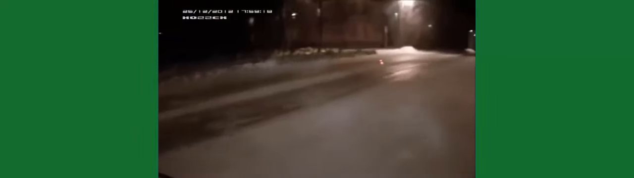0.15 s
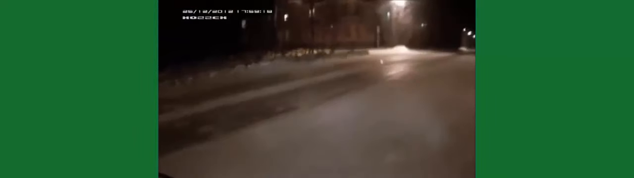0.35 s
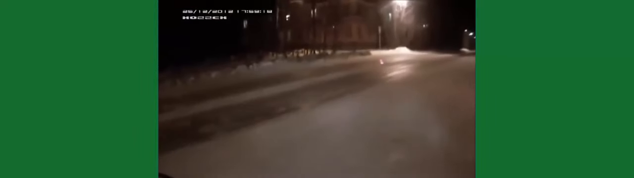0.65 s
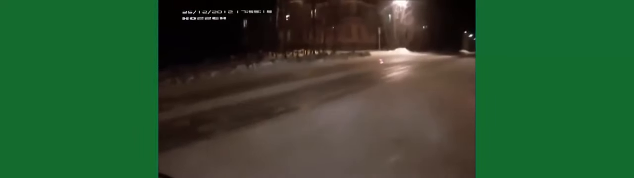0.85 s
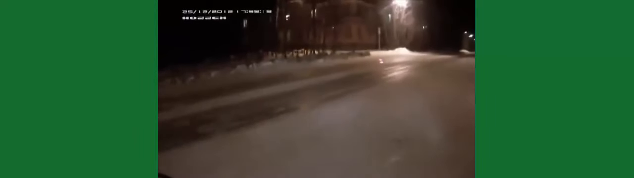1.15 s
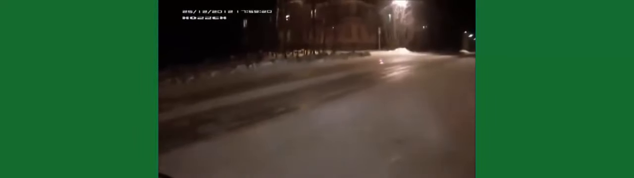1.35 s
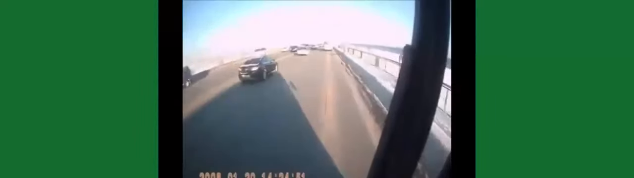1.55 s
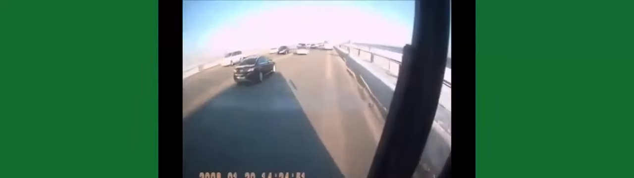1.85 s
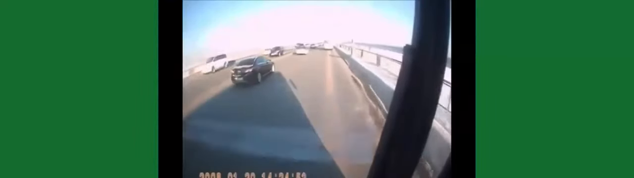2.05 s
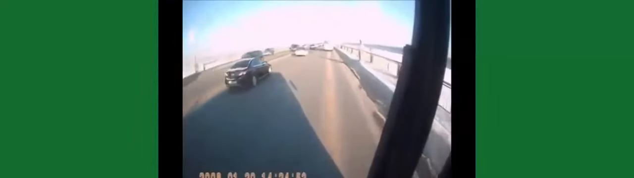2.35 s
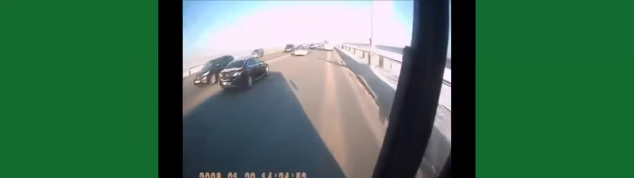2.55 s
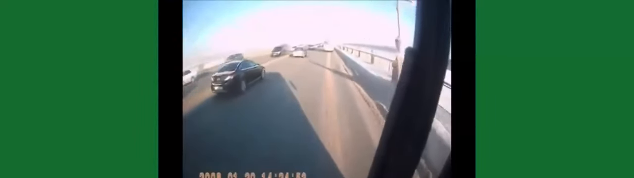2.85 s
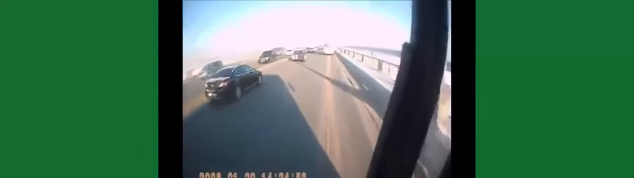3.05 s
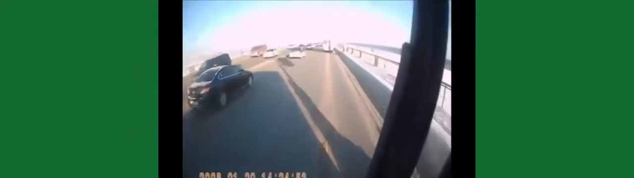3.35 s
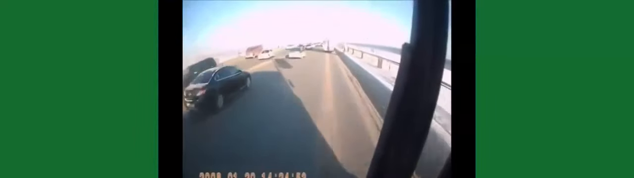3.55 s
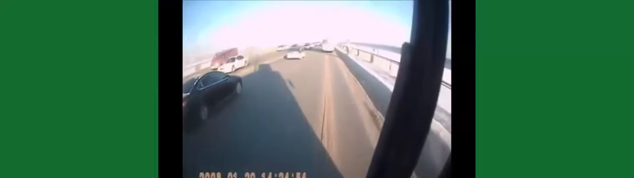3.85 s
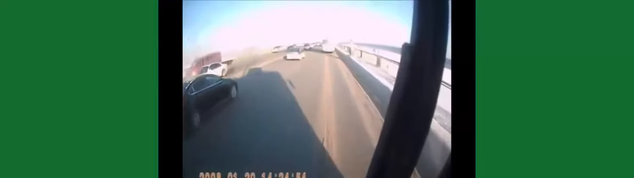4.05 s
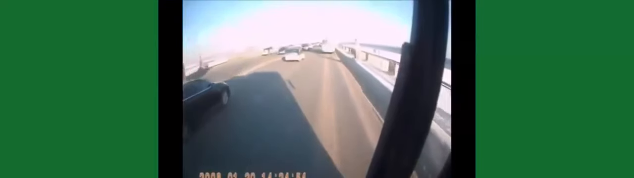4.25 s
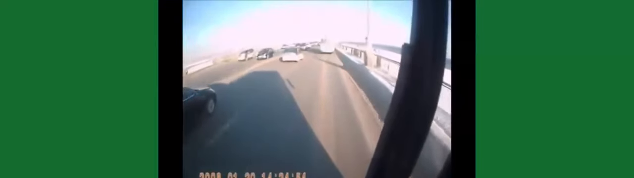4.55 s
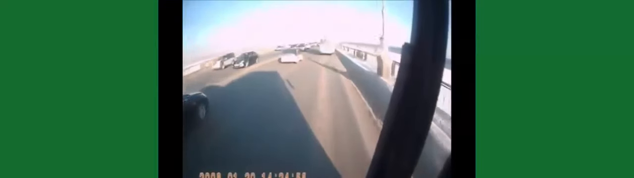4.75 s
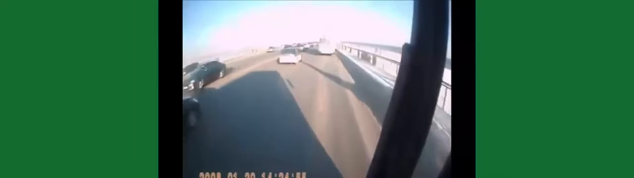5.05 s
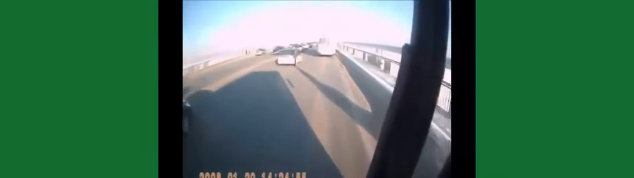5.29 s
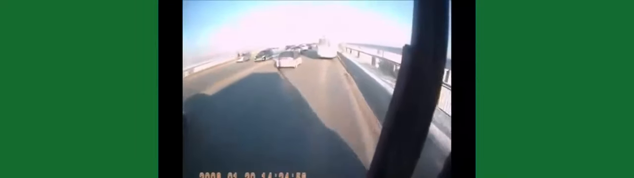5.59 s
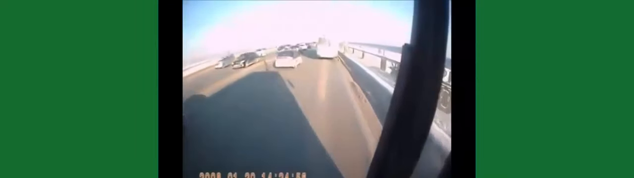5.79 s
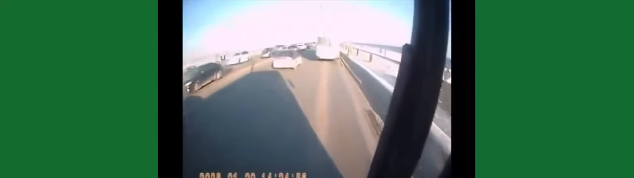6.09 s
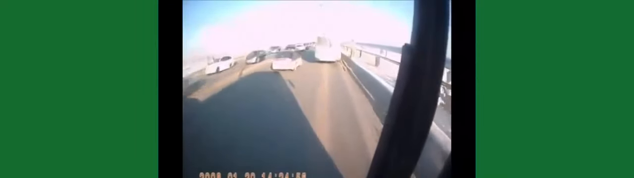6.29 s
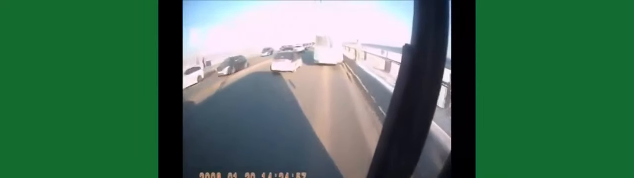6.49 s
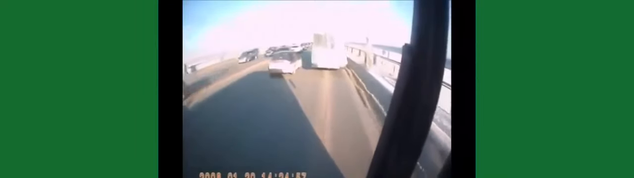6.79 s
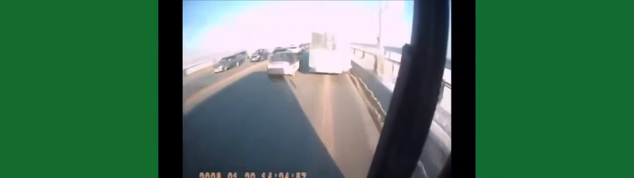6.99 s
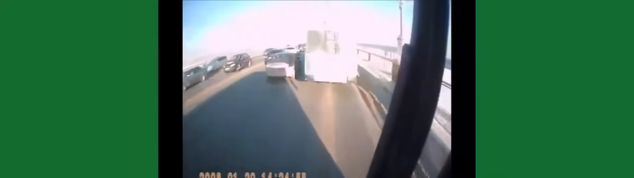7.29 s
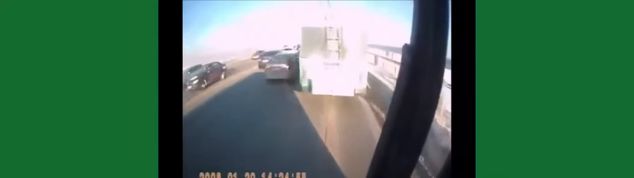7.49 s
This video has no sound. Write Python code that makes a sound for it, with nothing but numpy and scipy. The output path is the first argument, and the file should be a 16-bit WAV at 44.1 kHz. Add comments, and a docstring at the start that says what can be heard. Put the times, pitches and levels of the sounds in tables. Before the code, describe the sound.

A violent car crash with booming body, crunching metal and scattering debris, then an abrupt cut to dull bus road rumble with jolts and rattling panels.

```python
"""Night crash, then a bus ride

Two dashboard cameras, one after the other. First a car crashes at night over its idling engine: the shell booms,
panels thud, metal crunches, debris sprays, all shaped from noise; small bits tick and trim squeaks as plain tones.
Then a bus crosses a bridge: filtered noise makes the dull road roar and the rattling panels, short low swings
make the jolts over joints. The crash overloads an off-centre input; the bus sounds dull, with false copies."""
import sys
import numpy as np
from scipy import signal
from scipy.fft import rfft, irfft, next_fast_len
from scipy.io import wavfile
from scipy.ndimage import uniform_filter1d

SR = 44100
rng = np.random.default_rng(int(sys.argv[2]) if len(sys.argv) > 2 else 0)


def unload_audio(sound):
    """Save the sound as a 16-bit wav file, at the path given as the first command line argument."""
    columns = np.transpose(np.atleast_2d(sound))
    # keep every value between -1 and 1, then stretch to whole-number steps
    steps = np.round(np.clip(columns, -1, 1) * 32767)
    wavfile.write(sys.argv[1], SR, steps.astype(np.int16))


N = 336483
T = np.arange(N) / SR  # time of each sample [s]
CUT_S = 1.779  # the crash gives way to the bus


def amp(db):
    """Turns dB into a plain multiplier."""
    return 10 ** (np.asarray(db) / 20)


def evened(x):
    """Scales a signal to an average strength (rms) of 1."""
    return x / np.sqrt(np.mean(x ** 2) + 1e-20)


def smooth_noise(length):
    """Slowly wandering noise, averaged over this many samples, rms 1."""
    return evened(uniform_filter1d(rng.standard_normal(N), size=length))


def column(rows, index):
    """Draws straight lines between the rows of a table, to get a value for every sample."""
    rows = np.asarray(rows, float)
    return np.interp(T, rows[:, 0], rows[:, index])


def add(mix, s, sound):
    """Mixes a sound in, starting at s seconds."""
    part = mix[max(round(s * SR), 0):][:len(sound)]
    part += sound[:len(part)]


def colour(x, points):
    """Gives noise its tone by making some pitches stronger than others; rms 1."""
    f, db = np.transpose(points)
    hz = np.fft.rfftfreq(N, 1 / SR)
    gain_db = np.interp(np.log(hz + 1), np.log(f + 1), db, -120, -120)
    return evened(irfft(rfft(x) * amp(gain_db), N))


def steady(x, share):
    """Evens out part of the chance swells of a narrow noise."""
    outline = abs(signal.hilbert(x, next_fast_len(N))[:N])
    swell = uniform_filter1d(outline, size=900)
    return evened(x / (swell + 0.066) ** share)


def grit(per_s, spread_db, share, patchy_db):
    """Noise mixed with a share of uneven clicks, in drifting patches of time and pitch."""
    sizes = amp(spread_db * np.minimum(rng.exponential(1, N), 4))
    clicks = sizes * (rng.random(N) < per_s / SR)
    clicks = evened(clicks * rng.choice([-1, 1], N))
    x = share * clicks + (1 - share) * rng.standard_normal(N)
    z = signal.stft(x, nperseg=256, noverlap=192)[2]
    patches = uniform_filter1d(rng.standard_normal(z.shape), size=3, axis=0)  # across pitch
    patches = evened(uniform_filter1d(patches, size=20, axis=1))  # across time
    return signal.istft(z * amp(patchy_db * patches), nperseg=256, noverlap=192)[1][:N]


def whistle(rows, waver):
    """A wavering tone that follows rows of time, pitch and level, with soft edges at both ends."""
    drift = smooth_noise(300)
    inside = 1. * (T > rows[0][0]) * (T < rows[-1][0])
    inside = uniform_filter1d(inside, size=600)
    turns = np.cumsum(column(rows, index=1) * (1 + waver * drift)) / SR
    return np.sqrt(2) * amp(column(rows, index=2)) * inside * np.sin(2 * np.pi * turns)


def bursts(times, dbs, rise, holds, t60):
    """Loudness of bursts that rise quickly, hold, then die by 60 dB in t60 seconds."""
    out, t = np.zeros(N), T[:30000]
    for s, db, hold in np.broadcast(times, dbs, holds):
        fall_db = 60 * np.maximum(t - hold, 0) / t60
        add(out, s, amp(db - fall_db) * (1 - np.exp(-t / max(rise, 1e-5))))
    return out


# Tone of the booming car shell: (pitch [Hz], relative level per Hz [dB])
BOOM_TONE = [(7.1, 0), (12, -10.5), (33, 1.5), (54, 2), (67, -1), (86, -32), (113, -6), (130, -17.5),
             (170, -70), (290, -120)]
# Loudness of that boom: (time [s], level [dB])
BOOM_LEVEL = [(0, -17.5), (.18, -20.5), (.3, -30), (.6, -30), (.66, -20), (.84, -24.5), (.98, -30.5),
              (1.11, -34.5), (1.15, -32), (1.2, -38.5), (1.5, -32), (1.78, -47)]


def shell_boom():
    """The big hollow shell shakes the air at low pitch: steadied low noise."""
    return amp(column(BOOM_LEVEL, index=1)) * steady(colour(rng.standard_normal(N), BOOM_TONE), 0.91)


# Blows of the crash: (time [s], hold [s], panel thud level [dB], crunch level [dB], debris spray level [dB])
BLOWS = [(0.0, 0.017, -20.5, -27.5, -42), (0.036, 0.032, -52, -38, -51), (0.078, 0.036, -32.5, -36.5, -49),
         (0.137, 0.04, -32, -47, -56), (0.176, 0.02, -36.5, -39.5, -47.5), (0.233, 0.021, -38.5, -47, -54),
         (0.269, 0.0094, -40.5, -52, -66), (0.354, 0.025, -43.5, -48, -54), (0.426, 0.016, -43, -60, -65),
         (0.642, 0.028, -33, -54, -52), (0.684, .03, -33.5, -40.5, -55.5), (0.738, 0.052, -29, -40, -50),
         (0.8, 0.03, -39, -53, -57), (0.867, 0.062, -41.5, -52, -64), (1.059, 0.025, -43, -45, -56),
         (1.118, 0.017, -53, -49, -54), (1.139, .025, -63, -43, -45), (1.184, 0.072, -49, -40.5, -43.5),
         (1.28, .03, -63, -49.5, -56), (1.353, .015, -48, -55, -57), (1.69, 0.024, -48, -46.5, -65)]
BLOW_RISE_S = 0.0032


def blow_level(index, t60, rest_db):
    """Each blow adds a dying burst to the steady rattling that goes on between blows."""
    rows = np.transpose(BLOWS)
    return np.hypot(amp(rest_db), bursts(rows[0], rows[index], BLOW_RISE_S, rows[1], t60))


# Tone of the thudding panels: (pitch [Hz], relative level per Hz [dB])
THUD_TONE = [(59, -19), (100, 3.5), (119, -6.5), (189, -2.5), (232, -4), (376, -10), (415, -11),
             (471, -13.5), (638, -15.5), (850, -16), (1100, -56), (1870, -120)]


def thuds():
    """Struck panels thud: low gritty noise, steadied, that swells at each blow."""
    return blow_level(2, t60=0.28, rest_db=-42.5) * steady(colour(grit(300, 2.6, 0.27, 1.0), THUD_TONE), 1.0)


# Tone of the crunching metal: (pitch [Hz], relative level per Hz [dB])
CRUNCH_TONE = [(470, 9), (800, -8), (992, 0), (1250, 6), (1420, -0.5), (1660, -4), (2080, -14.5),
               (2250, -14.5), (2440, -22), (2800, -19.5), (3640, -40), (6160, -120)]


def crunches():
    """Bending metal crunches: mid-pitched noise with a few clicks."""
    return blow_level(3, t60=0.16, rest_db=-47.5) * colour(grit(900, 3.1, 0.1, 1.0), CRUNCH_TONE)


# Tone of the flying debris: (pitch [Hz], relative level per Hz [dB])
SPRAY_TONE = [(1470, 8), (2500, -11.5), (2980, -21), (3170, -9.5), (4330, -5), (5160, -6.5), (6100, -6.5),
              (6780, -3.5), (7370, -8.5), (10000, -13), (10700, -17.5), (14500, -23.5), (15400, -24)]


def sprays():
    """Many small bits of debris hit at once: bright noise full of clicks."""
    return blow_level(4, t60=0.24, rest_db=-60.5) * colour(grit(2100, 4.7, 0.36, 1.6), SPRAY_TONE)


# Tone of the steady sliding hiss: (pitch [Hz], relative level per Hz [dB])
SCRAPE_TONE = [(1470, -42), (2500, -71), (2930, -7), (3210, -13), (3770, 0), (4040, -3), (4740, 4),
               (5480, -5), (6140, -13), (7780, 0), (8650, -40), (10000, -17), (11000, -22), (14500, -27),
               (15400, -29)]
# Loudness of the sliding: (time [s], level [dB])
SLIDE_LEVEL = [(0, -79), (.7, -82), (.95, -60.5), (1.4, -59.5), (1.78, -56.5)]


def scrape():
    """Sliding makes a steady bright hiss, with a slight grain."""
    return amp(column(SLIDE_LEVEL, index=1)) * colour(grit(2500, 3.0, .15, 1.5), SCRAPE_TONE)


IDLE_HZ, ORDERS_DB = 39.6, [-39, -49, -49]  # firing rate [Hz]; levels at 1, 2 and 3 times it [dB]


def idle():
    """The engine hums at its firing rate and the first multiples of it."""
    out = np.zeros(N)
    for k, db in enumerate(ORDERS_DB, 1):
        out += np.sqrt(2) * amp(db) * np.sin(2 * np.pi * (k * IDLE_HZ * T + rng.random()))
    return out


# Small hard bits striking, and a last short click just before the scene changes: (time [s], starting level
# [dB], pitch [Hz], time to fall by 60 dB [s])
TICKS = [(.0201, -41, 5650, .05), (.0202, -37, 2300, 0.069), (.0861, -51, 3600, .05),
         (0.1346, -39, 5170, .017), (.1551, -47, 4070, .05), (0.2332, -33, 1006, 0.054),
         (.2551, -49, 2290, .065), (0.292, -27, 1230, 0.023), (0.2916, -40, 6200, .01),
         (0.3847, -55, 3900, 0.12), (.4321, -51.5, 6700, 0.13), (.4751, -54, 4250, 0.089),
         (.5671, -52, 6500, .005), (0.6533, -29, 6200, .005), (0.6874, -31, 1190, 0.049),
         (.7201, -43, 6030, .005), (0.871, -40, 1200, .03), (0.9007, -41, 8440, 0.006),
         (1.3601, -53, 7000, .01), (1.5821, -50, 8000, .01), (1.7721, -47, 6650, .011)]


def ticks():
    """Each tick is a dying, slightly ragged ring; very short ones sound like broad clicks."""
    out, t = np.zeros(N), T[:6000]
    ragged = 1 + 0.24 * smooth_noise(60)
    for s, db, hz, t60 in TICKS:
        add(out, s, amp(db - 60 * t / t60) * np.sin(2 * np.pi * hz * t))
    return out * ragged


# Low shudder of the second big blow: (time [s], pitch [Hz], level [dB])
SHUDDER = [(0.58, 49.35, -47), (0.626, 56.2, -30), (0.646, 59.7, -18), (0.722, 55.4, -27),
           (0.764, 51.2, -22.5), (0.798, 46.8, -24), (0.83, 45.8, -20), (0.98, 39, -52)]


def shudder():
    """A deep wavering tone whose pitch climbs and then sinks."""
    return whistle(SHUDDER, 0.027)


# Rubbing trim: (time [s], length [s], starting pitch [Hz], level [dB])
SQUEAKS = [(0.868, 0.055, 1603, -50.5), (1.305, 0.037, 1614, -53), (1.472, 0.034, 2350, -64),
           (1.405, 0.045, 1207, -50), (1.478, 0.047, 1620, -47), (1.483, 0.033, 1233, -49),
           (1.548, .05, 1216, -48.5), (1.677, 0.035, 1264, -42.5), (1.678, 0.087, 1636, -53),
           (1.708, 0.047, 1200, -49)]
SQUEAK_SAG = 0.018  # share of its pitch that a squeak loses


def squeaks():
    """Rubbing trim gives short wavering tones that sag a little in pitch."""
    out = np.zeros(N)
    for s, length, hz, db in SQUEAKS:
        out += whistle([(s, hz, db), (s + length, hz * (1 - SQUEAK_SAG), db)], 0.0134)
    return out


# Tone of the booming bus floor: (pitch [Hz], relative level per Hz [dB])
FLOOR_TONE = [(4.7, -37), (8.0, -9), (22, 5), (38, -4), (50, -10.5), (64, -21), (96, -18.5), (129, -28.5),
              (150, -29.5), (200, -49), (330, -120)]
# Tone of the road roar: (pitch [Hz], relative level per Hz [dB])
ROAR_TONE = [(35, -33.5), (60, 8.5), (65, -1), (124, -1), (162, -11), (199, -9), (293, -12.5), (334, -12),
             (469, -16.5), (642, -17.5), (1080, -37.5), (1400, -78), (2380, -120)]
# Tone of the tyre hiss: (pitch [Hz], relative level per Hz [dB])
HISS_TONE = [(560, -5), (950, -0.5), (1060, -12.5), (1140, 1.5), (1360, 1.5), (1470, 3), (1650, -4),
             (1710, -11.5), (1840, -9.5), (2020, -20.5), (2360, -14), (3620, -26.5), (4200, -18.5),
             (5200, -42), (6760, -45.5), (11400, -120)]
# Loudness in the bus: (time [s], floor boom level [dB], road roar level [dB], tyre hiss level [dB])
ROAD_LEVELS = [(1.78, -38, -42.5, -61.5), (2.1, -42, -42, -61.5), (2.66, -41, -42, -60),
               (2.78, -35.5, -39.5, -60.5), (2.95, -27, -37.5, -59), (3.15, -36.5, -40.5, -64),
               (3.46, -32, -42.5, -56.5), (3.52, -40, -46, -66), (4.06, -40.5, -43.5, -63.5),
               (4.2, -37.5, -42, -64.5), (4.76, -40, -45.5, -64.5), (4.9, -38, -43, -58.5),
               (5.3, -39.5, -43.5, -58), (5.95, -35.5, -43.5, -60.5), (6.15, -36.5, -45.5, -60),
               (6.45, -38, -43.5, -60), (6.55, -38.5, -45.5, -60), (7.2, -38.5, -45.5, -62.5),
               (7.63, -38, -44.5, -61)]
BUMPS_PER_S, BUMPS_DB = 8, 3  # the uneven road makes the floor swell and sink (averaging rate, rms swing)


def road():
    """Three noises from the rolling wheels: deep floor boom, dull roar and patchy tyre hiss."""
    bumps = smooth_noise(round(SR / BUMPS_PER_S))
    floor_level = amp(column(ROAD_LEVELS, index=1) + BUMPS_DB * bumps)
    floor = floor_level * steady(colour(rng.standard_normal(N), FLOOR_TONE), 0.97)
    roar = amp(column(ROAD_LEVELS, index=2)) * steady(colour(grit(400, 3.4, 0.13, 1.0), ROAR_TONE), 0.45)
    hiss = amp(column(ROAD_LEVELS, index=3)) * colour(grit(1200, 8.5, 0.19, 1.7), HISS_TONE)
    return floor + roar + hiss


# Faint drive-line tones, mostly sinking as the bus brakes; one list each: (time [s], pitch [Hz], level [dB])
DRONES = [
    [(1.78, 362.7, -51.5), (2.5, 362, -56.5), (4.3, 356, -62), (5.2, 326, -55), (6.1, 296.2, -57),
     (7.0, 266, -58.5), (7.63, 255.2, -64.5)],
    [(1.78, 645.5, -59), (3.5, 648.2, -65), (5.3, 640, -63), (7.63, 625.7, -66)],
    [(6.1, 538.5, -64), (6.4, 520, -62.5), (7.4, 455.2, -62), (7.63, 448, -62)],
    [(4.05, 40.63, -47), (4.25, 42.15, -43), (4.8, 40.86, -41.5), (5.45, 37.42, -40), (6.0, 34.93, -41),
     (6.6, 32, -45.5)],
]
DRONE_FADE_DB = 3  # rms swing as the tones come and go


def drones():
    """The turning drive line gives wavering tones that follow the table and fade at random."""
    out = np.zeros(N)
    for rows in DRONES:
        out += amp(DRONE_FADE_DB * smooth_noise(6000)) * whistle(rows, 0.025)
    return out


# Wheels over joints: (time of the strongest push [s], peak level [dB], pitch [Hz])
JOLTS = [(2.807, -24, 27.7), (2.866, -26, 27.6), (2.913, -26, 27.3), (2.973, -25.5, 42), (3.292, -23, 34.7),
         (3.36, -25, 38.2), (3.471, -27, 28.85), (4.886, -29.5, 35.3), (5.039, -20.5, 33.2),
         (5.534, -24, 34.3)]


def jolts():
    """The floor drops and springs back: a short low swing with soft ends."""
    out, t = np.zeros(N), T[:4410] - T[2205]
    for s, db, hz in JOLTS:
        add(out, s + t[0], -amp(db) * np.cos(2 * np.pi * hz * t) * np.exp(-(1.42 * hz * t) ** 2))
    return out


# Ringing tones of the panels: (pitch [Hz], width [Hz], relative level [dB])
PANEL_MODES = [(2324, 110, -0.5), (3100, 85, -11), (3580, 68, -6.5), (4050, 60, -5.5), (4326, 71, -3.5),
               (4400, 70, -10.5)]


def panel_ring():
    """Noise passed through the few pitches at which the panels ring, rms 1."""
    f = np.fft.rfftfreq(N, 1 / SR)
    modes = sum(amp(db) / (1 + 1j * (f - hz) / width) ** 2 for hz, width, db in PANEL_MODES)
    return evened(irfft(rfft(rng.standard_normal(N)) * modes, N))


# Tone of the chattering panels: (pitch [Hz], relative level per Hz [dB])
CHATTER_TONE = [(560, -19), (950, -29), (1200, -2.5), (1390, 0), (1480, 0.5), (1640, -1.5), (1740, -20),
                (1830, -12.5), (2020, -26.5), (2350, -22), (2860, -30), (3140, -24.5), (3750, -38.5),
                (4360, -24), (5300, -56), (6890, -70), (11700, -120)]
# Tone of the duller knock: (pitch [Hz], relative level per Hz [dB])
KNOCK_TONE = [(88, -32), (150, 0.5), (328, -5), (405, -7), (551, -3.5), (829, -12.5), (878, -16),
              (1100, -16.5), (1430, -39), (2420, -120)]
# Loose panels shaking: (time [s], chatter level [dB], knock level [dB], thin ringing treble level [dB])
RATTLES = [(2.823, -64, -62, -66), (2.85, -53, -39, -60.5), (2.891, -57, -51, -77), (2.908, -62, -54, -68),
           (2.9538, -56, -40.5, -55.5), (3.008, -63, -50, -73), (3.06, -56, -44, -69),
           (3.1348, -73, -62, -68), (3.1842, -61.5, -57, -74), (3.2125, -61, -49, -68),
           (3.285, -60.5, -49, -74), (3.3126, -73, -52, -77), (3.339, -48, -37, -58.5),
           (3.369, -55, -39.5, -76), (3.4143, -57, -52, -62.5), (3.458, -70, -47.5, -71),
           (3.52, -70, -60, -74), (3.6594, -60, -66, -75), (3.8866, -68, -61, -75), (4.1, -70, -56, -75),
           (4.2, -72, -58, -75), (4.48, -69, -58, -72), (5.569, -72, -55, -63.5), (5.5863, -63, -46, -59),
           (5.6305, -60, -56, -74), (5.6575, -68, -51, -72), (5.854, -67, -54, -81),
           (6.3572, -68, -47.5, -72), (6.6079, -52, -49, -62), (6.6249, -51.5, -47, -60),
           (6.6594, -76, -53, -72), (6.6902, -70, -56, -65.5), (6.7294, -71, -66, -73),
           (7.3475, -63, -52, -83), (7.46, -68, -58, -71)]
RATTLE_RISE_S, RATTLE_HOLD_S, RATTLE_T60_S, TREBLE_T60_S = 0.003, 0.011, 0.13, 0.23
RING_DB, CLICK_DB = -3, 9  # panel ring and opening click, compared with the thin treble


def rattles():
    """Loose panels chatter with a knock, a click and a thin ringing treble that shakes on a little longer."""
    s, chatter_db, knock_db, treble_db = np.transpose(RATTLES)
    chatter = colour(grit(1500, 3.5, 0.41, 0.39), CHATTER_TONE)
    knock = colour(grit(600, 2.5, .3, 1.2), KNOCK_TONE)
    thin = evened(signal.sosfiltfilt(signal.butter(3, 2000, "high", fs=SR, output="sos"), chatter))
    treble = thin + amp(RING_DB) * panel_ring()
    chatter_level = bursts(s, chatter_db, RATTLE_RISE_S, RATTLE_HOLD_S, RATTLE_T60_S)
    knock_level = bursts(s, knock_db, RATTLE_RISE_S, RATTLE_HOLD_S, RATTLE_T60_S)
    treble_level = bursts(s, treble_db, RATTLE_RISE_S, RATTLE_HOLD_S, TREBLE_T60_S)
    click_level = bursts(s + 0.0018, treble_db + CLICK_DB, 0, 0, 0.0032)
    return chatter_level * chatter + knock_level * knock + treble_level * treble + click_level * thin


# One panel sings: (start [s], end [s], pitch [Hz], level [dB])
BUZZES = [(5.576, 5.623, 1504, -59), (6.63, 6.651, 1488, -44)]


def panel_buzz():
    """A shaking panel briefly sings a wavering tone."""
    return sum(whistle([(start, hz, db), (end, hz, db)], .012) for start, end, hz, db in BUZZES)


def scene():
    """The crash up to the cut, the duller bus after it, joined by a very short crossfade."""
    crash = shell_boom() + thuds() + crunches() + sprays() + scrape()
    crash += idle() + ticks() + shudder() + squeaks()
    bus = road() + drones() + jolts() + rattles() + panel_buzz()
    bus = signal.sosfiltfilt(signal.butter(5, 5200, fs=SR, output="sos"), bus)  # narrow band of the second camera
    share = np.clip((T - CUT_S) / .004 + .5, 0, 1)
    return np.tile((1 - share) * crash + share * bus, (2, 1))


# Strength of the clock error at 1, 2 and 3 times its repeat rate: (level [dB])
CLOCK_ERROR_DB = [-32.5, -38, -42.5]
CLOCK_HZ = 4473.6  # repeat rate of the uneven sample clock
OFFSET, CEILING = .021, .15  # input bias and overload level (full scale is 1)
SELF_NOISE_GAIN_DB = -89.5  # gain of the camera hiss
EDGE_HZ = 15550  # upper limit of the band


def record(dry):
    """Bias for the first camera, overload, uneven clock for the second; then hiss and a band limit for both."""
    first = T < CUT_S
    biased = dry + OFFSET * first * np.array([[-1], [1]])  # opposite in the two channels
    # above the ceiling only a small part of the swing gets through
    squashed = biased / (1 + abs(biased / CEILING) ** 6) ** (1 / 6)
    clipped = .76 * squashed + .24 * biased
    # a repeating clock error copies the sound, mostly its slope, around each multiple of the rate
    late = sum(amp(db) * np.cos(2 * np.pi * k * CLOCK_HZ * T) for k, db in enumerate(CLOCK_ERROR_DB, 1))
    band = signal.sosfilt(signal.butter(2, 2300, fs=SR, output="sos"), clipped)
    slope = np.gradient(band, axis=1) * SR / CLOCK_HZ
    copies = late * (slope + 0.066 * band)
    hiss = rng.standard_normal(N) + .3 * rng.standard_normal((2, N))  # mostly shared by the channels
    hiss = signal.sosfilt(signal.butter(10, 11800, fs=SR, output="sos"), hiss)
    out = clipped + ~first * copies + amp(SELF_NOISE_GAIN_DB) * hiss
    limit = signal.firwin(511, EDGE_HZ, window=("kaiser", 9), fs=SR)
    return signal.oaconvolve(out, limit[None], "same")


dry = scene()
out = record(dry)
unload_audio(out)
```